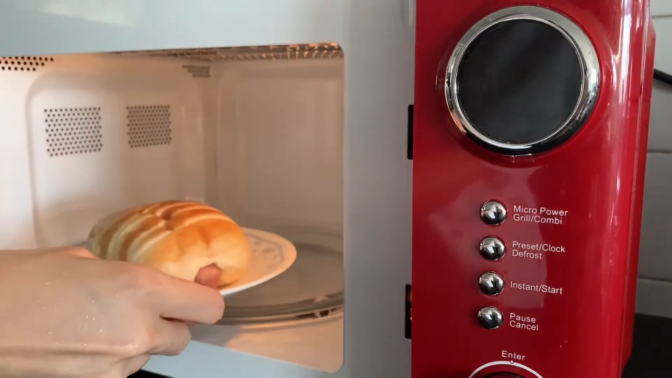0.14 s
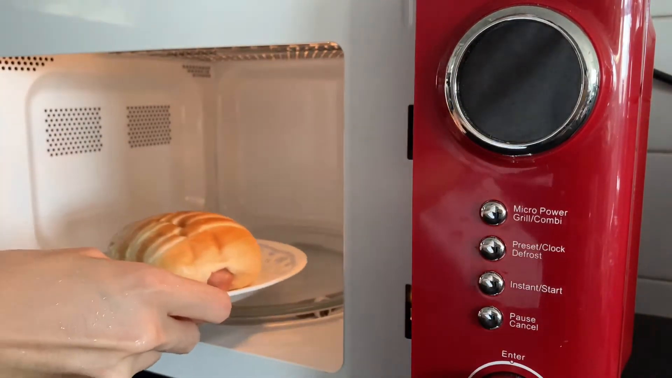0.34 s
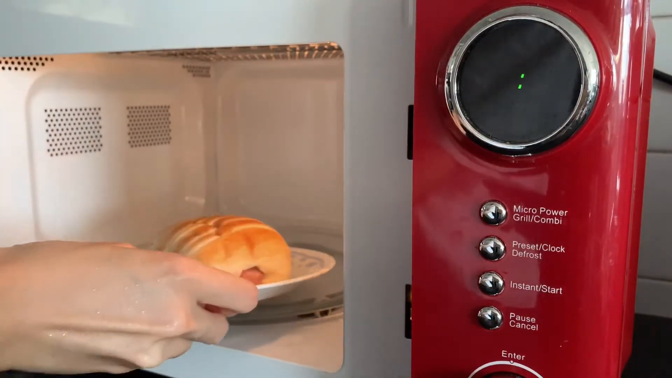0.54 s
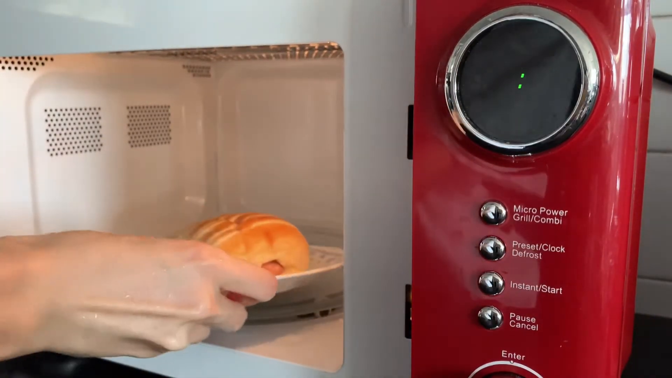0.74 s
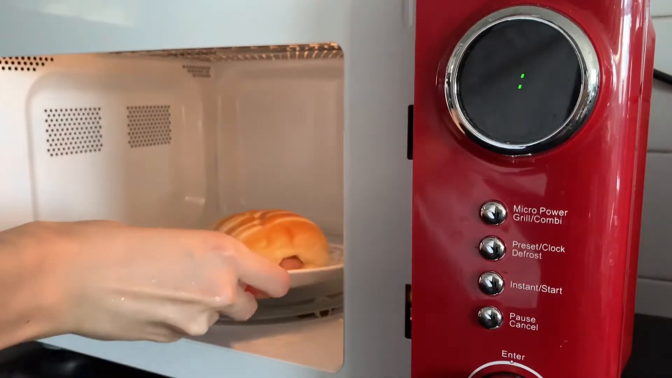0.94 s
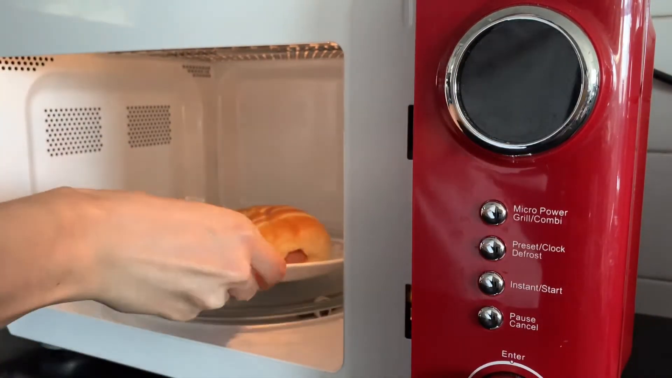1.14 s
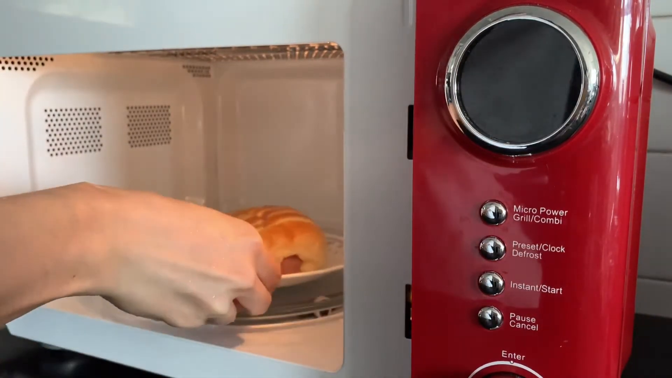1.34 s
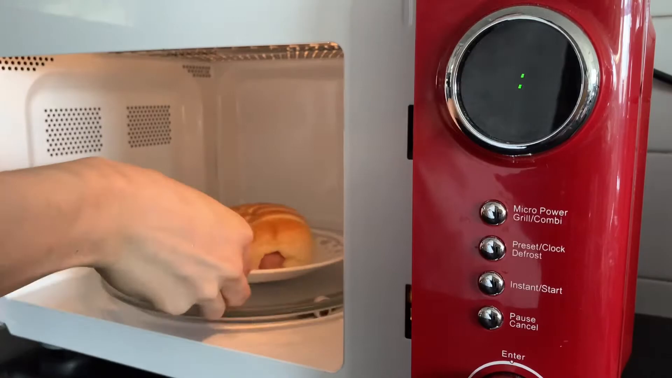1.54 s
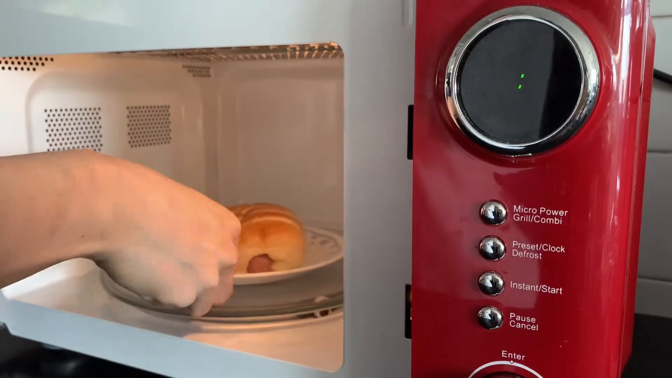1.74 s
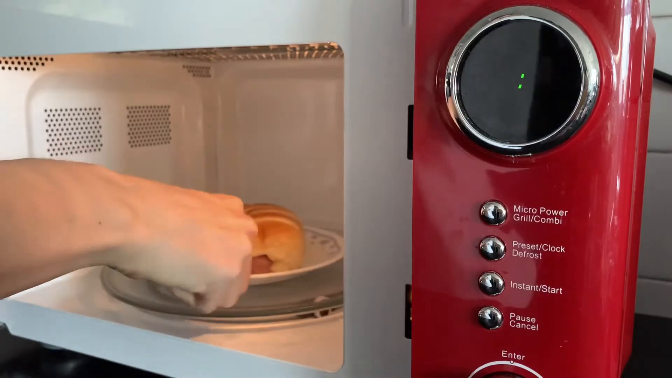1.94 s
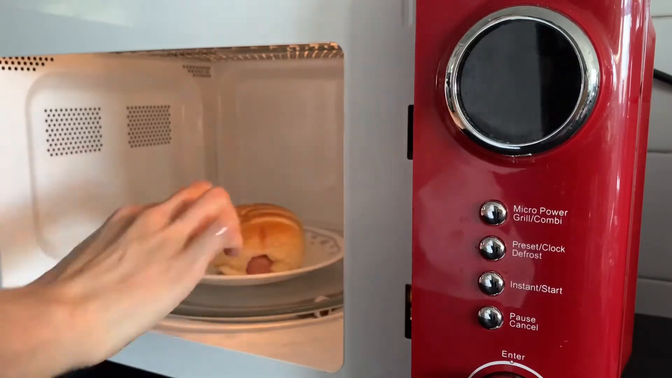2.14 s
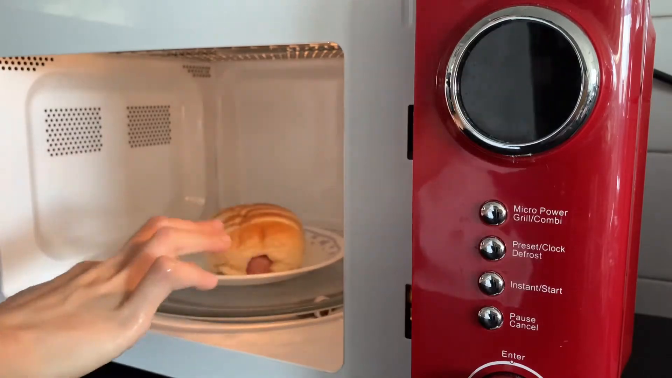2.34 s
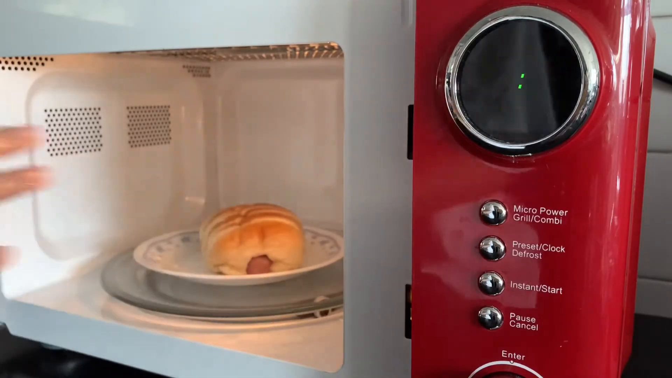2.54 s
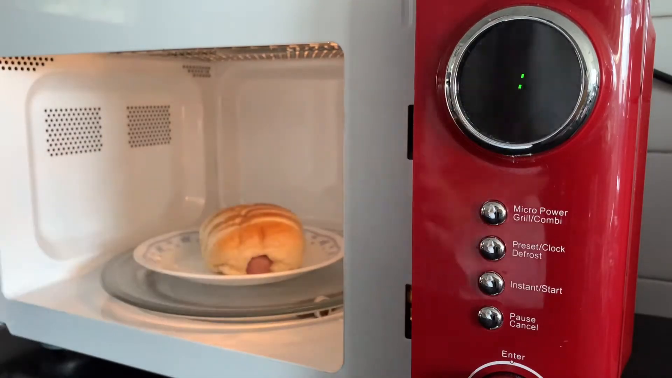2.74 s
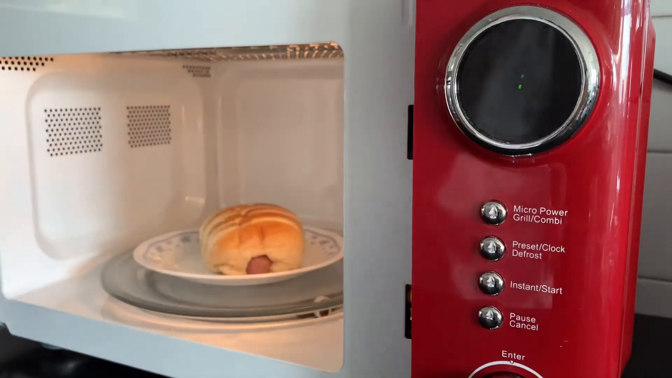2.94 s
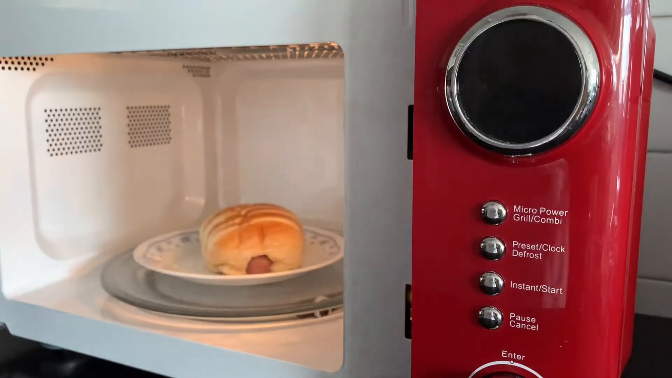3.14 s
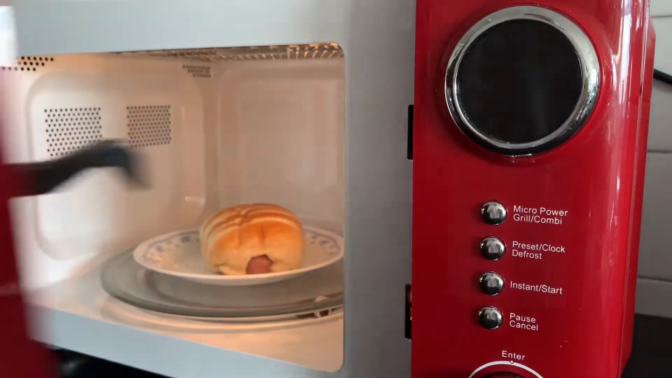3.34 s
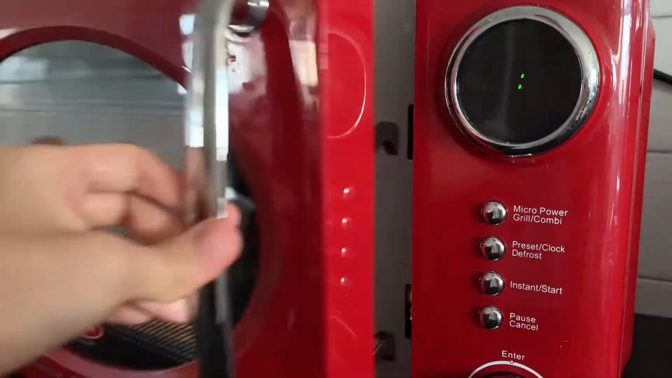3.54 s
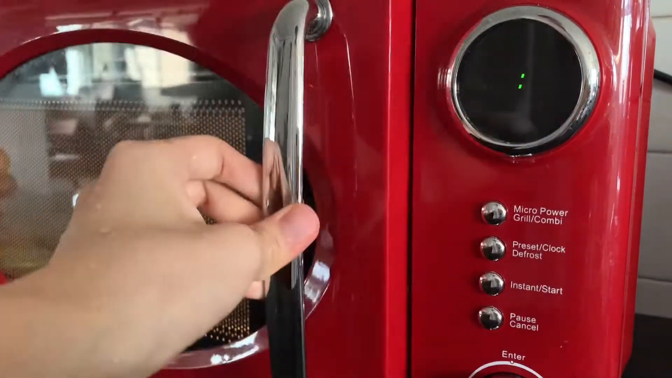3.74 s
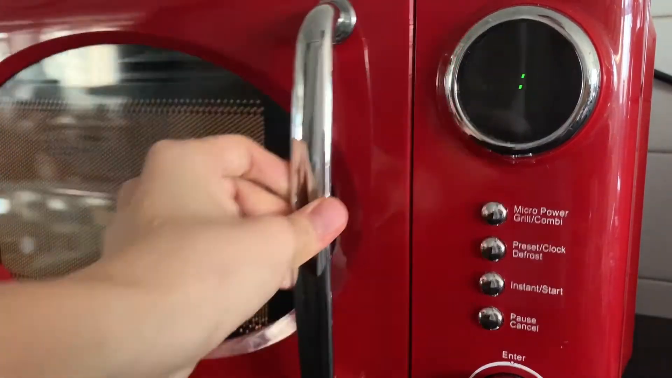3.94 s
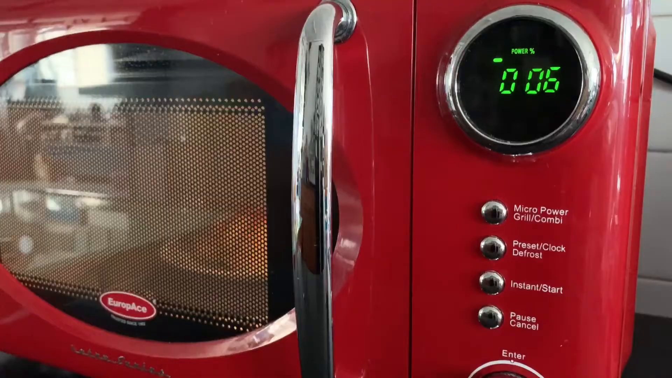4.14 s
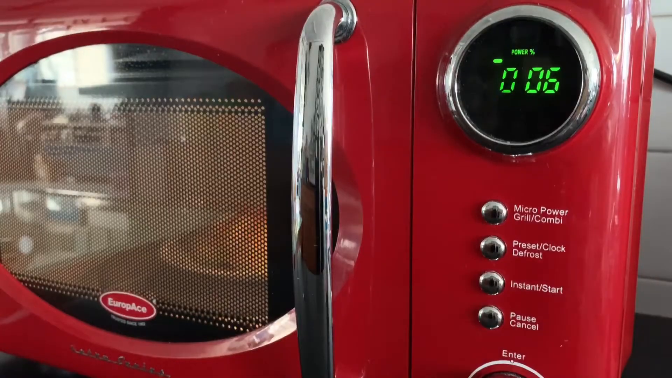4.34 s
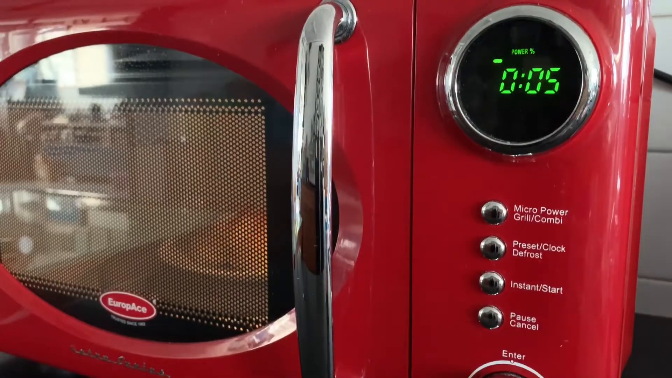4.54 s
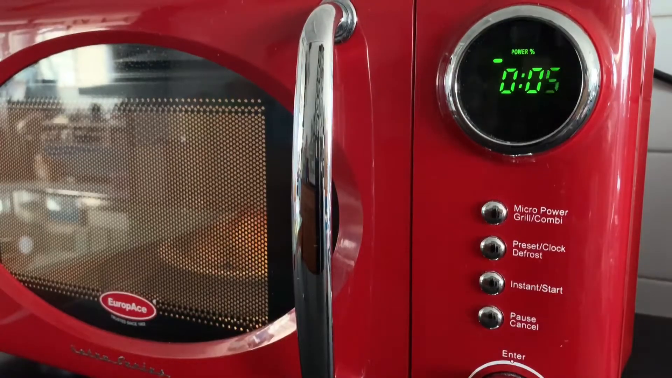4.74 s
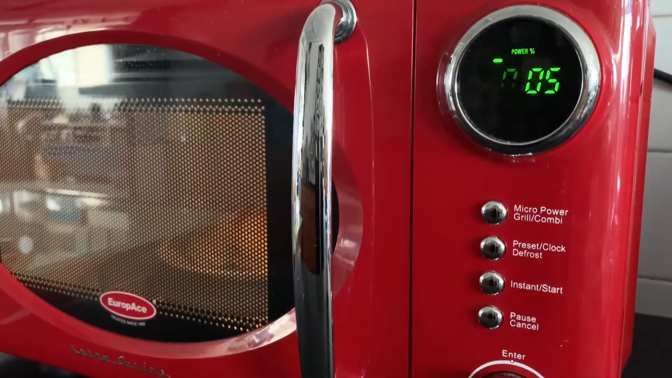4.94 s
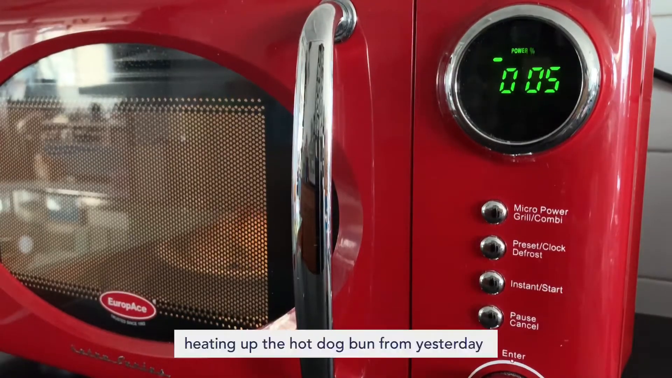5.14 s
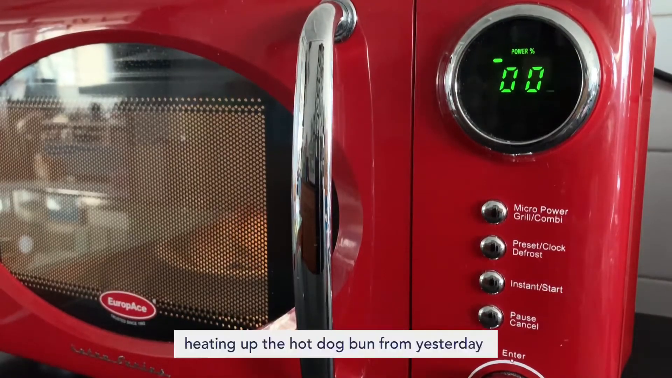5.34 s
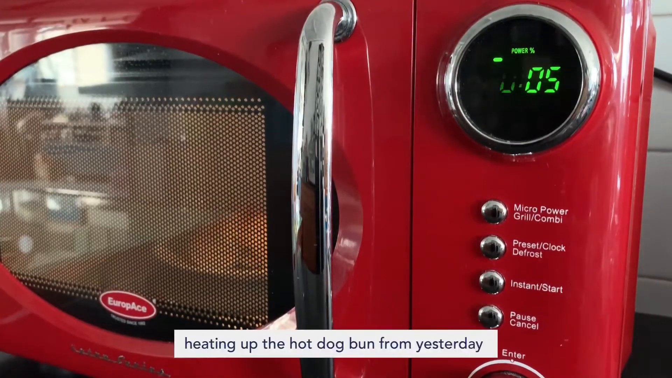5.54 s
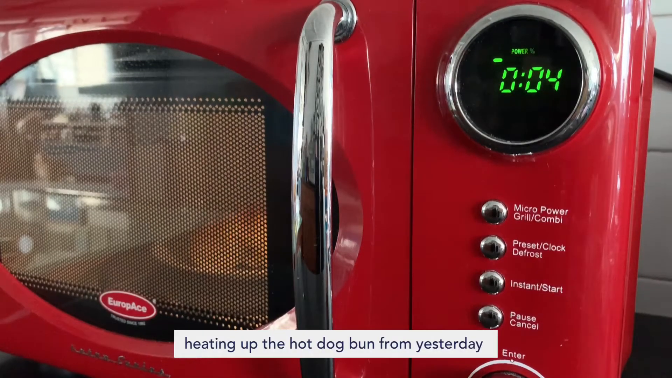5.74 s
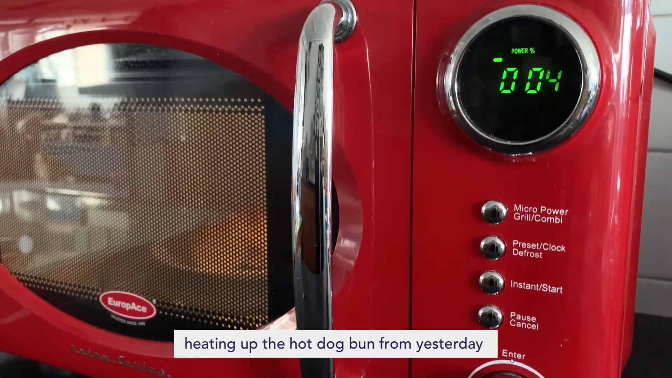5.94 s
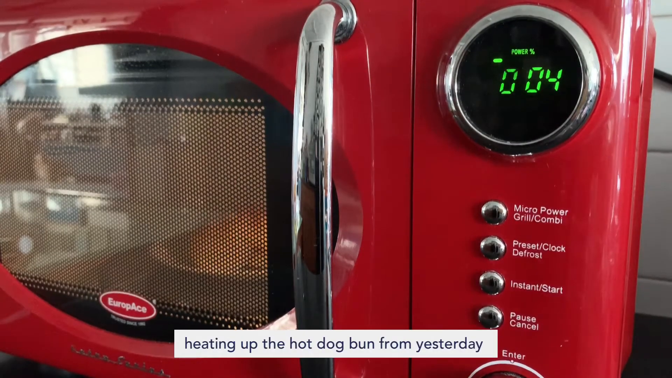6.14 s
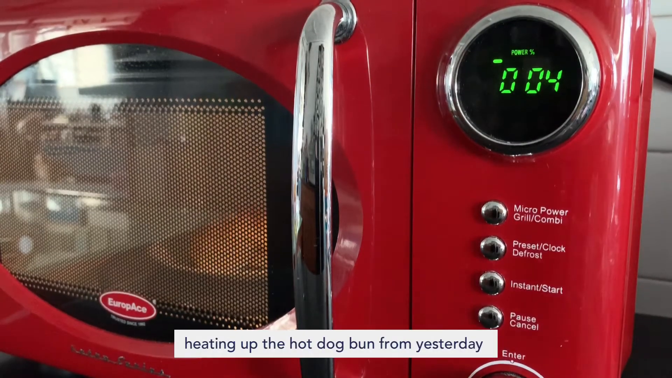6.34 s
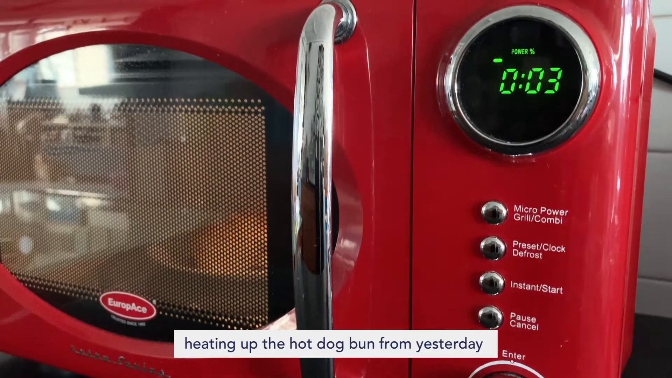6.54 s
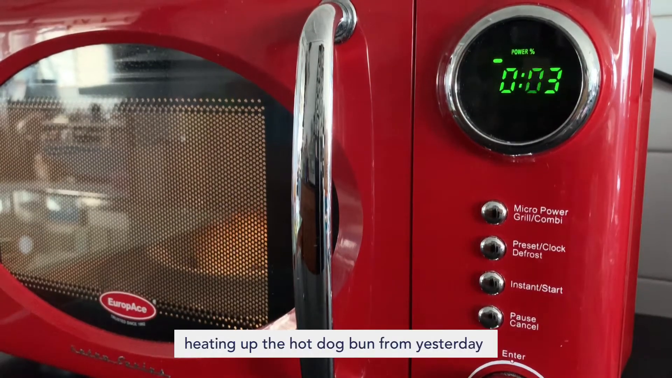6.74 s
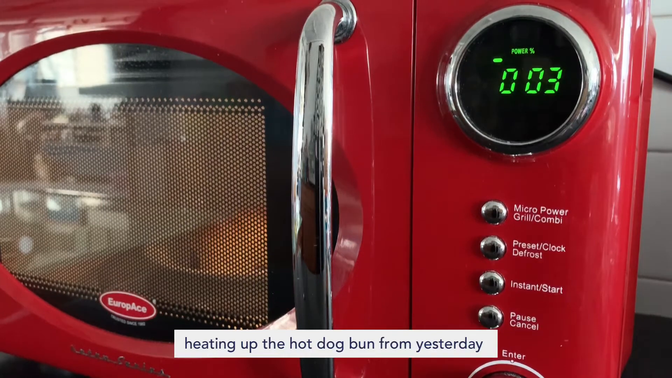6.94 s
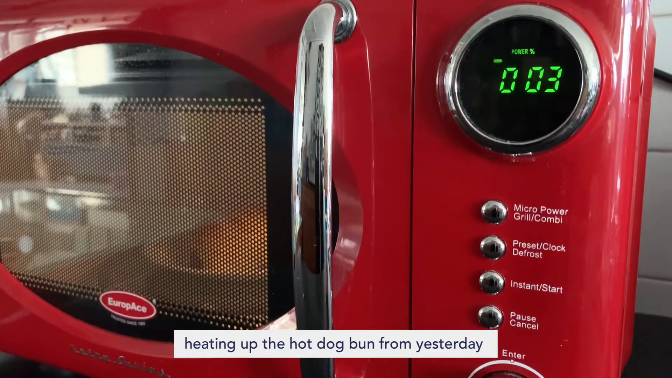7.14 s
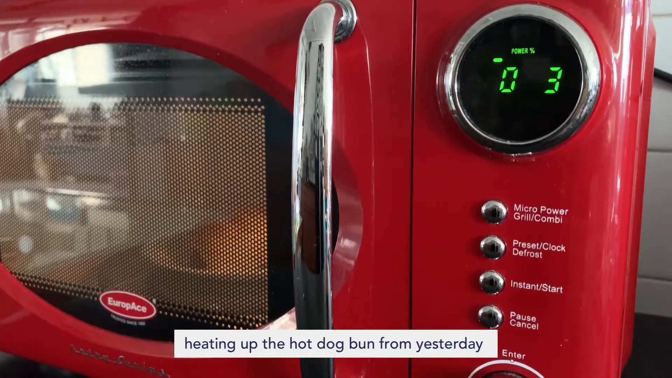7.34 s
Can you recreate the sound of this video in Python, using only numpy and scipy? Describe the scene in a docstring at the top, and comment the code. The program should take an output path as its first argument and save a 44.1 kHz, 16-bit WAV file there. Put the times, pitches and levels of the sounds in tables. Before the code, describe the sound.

Close stereo pickup in a quiet home kitchen with a faint low motor moaning. A china plate clinks sharply on a microwave's glass tray, squeaks as it slides, settles with short gritty taps and is nudged. After a pause the door clicks and slams hard; its tail is cut off by steady oven hum. Soft far bumps and rustles follow.

```python
"""A plate clinks on the glass tray of a microwave oven, slides, settles and is nudged while a far motor moans.
The door swings, latches and slams; the slam stops short and the oven is already humming.
Then something bumps far off in the kitchen, amid far rustles and a thin whistle.
Blows ring decaying sines under clacks of noise; air and rustles are coloured noise; hums are wandering sines.
A spaced pair of microphones hears the low bass nearly alike and much of the sound above it apart."""
import sys
import numpy as np
from scipy import signal
from scipy.fft import rfft, irfft
from scipy.io import wavfile
from scipy.ndimage import uniform_filter1d

SR = 44100
rng = np.random.default_rng(int(sys.argv[2]) if len(sys.argv) > 2 else 0)


def persist_wave(psi):
    """Save psi, clipped to +-1, as 16-bit WAV."""
    counts = np.round(np.clip(psi, -1, 1) * 32767).astype(np.int16)
    wavfile.write(sys.argv[1], SR, np.atleast_2d(counts).T)


N = 326340

# Left-right likeness of the room's sound. Each row: frequency in Hz, likeness from -1 to 1.
ROOM_LIKENESS = [(60, 0.93), (130, 0.33), (290, 0.71), (640, 0.089), (1410, -0.16), (3100, 0.019),
                 (6820, -0.18), (15000, 1)]
# Left-right likeness of the plate in the oven. Each row: frequency in Hz, likeness from -1 to 1.
PLATE_LIKENESS = [(60, 0.9), (130, 0.87), (290, 0.94), (640, 0.61), (1410, 0.063), (3100, -0.43),
                  (6820, 0.79), (15000, 0.16)]
# Colour of the gritty clack on the tray. Each row: frequency in Hz, relative level in dB per Hz.
GRIT_COLOUR = [(150, -53), (400, -1), (1000, -1.5), (1500, -1), (2500, -10), (4500, -13), (5500, -31.5),
               (7000, -14), (9500, -58), (13500, -27), (16000, -44)]


def gain_of(db):
    """Turns dB into amplitude."""
    return 10 ** (np.asarray(db) / 20)


def evened(x):
    """Scales to rms 1."""
    return x / np.sqrt(np.mean(x ** 2) + 1e-20)


def read(points, hz):
    """Reads a spectrum table on a log-frequency axis."""
    f, value = np.transpose(points)
    return np.interp(np.log(hz + 1), np.log(f + 1), value)


def curve(rows):
    """Reads a time table at every sample."""
    return np.interp(np.arange(N) / SR, *np.transpose(rows))


def drift(top_hz):
    """Slow chance of about rms 1: twenty sines of random phase, up to top_hz."""
    t = np.arange(0, N + 256, 256)
    rates = top_hz * np.geomspace(1 / 20, 1, 20)
    waves = sum(np.sin(2 * np.pi * (f * t / SR + rng.random())) for f in rates)
    return np.interp(np.arange(N), t, evened(waves))


def swell(start, rise, hold, fall):
    """Rises smoothly, holds and falls away; all in seconds."""
    t = np.arange(N) / SR - start
    return np.clip(np.minimum(t / rise, (rise + hold + fall - t) / fall), 0, 1) ** 2


def note_swell(start, length, fade):
    """A swell of a given length with equal fades."""
    return swell(start, fade, max(length - 2 * fade, 0), fade)


def glide(start, hz, sag_hz_per_s):
    """A sine whose pitch sinks steadily."""
    t = np.arange(N) / SR - start
    return np.sin(2 * np.pi * (hz - sag_hz_per_s * t / 2) * t)


def noise(colour, size, likeness=ROOM_LIKENESS, lean_db=0, low_hz=0, high_hz=SR):
    """Coloured noise in two ears; about rms 1 before the band is cut out."""
    hz = np.fft.rfftfreq(size, 1 / SR)
    left, other = rfft(rng.standard_normal((2, size)))
    same = np.clip(read(likeness, hz), -1, 1)
    right = same * left + np.sqrt(1 - same ** 2) * other
    shape = gain_of(read(colour, hz) + lean_db)
    spectrum = np.array([left, right]) * shape / np.sqrt(np.mean(shape ** 2))
    return irfft(spectrum * ((hz >= low_hz) & (hz < high_hz)), size)


def sinking_tones(notes, sag_hz_per_s, fade_s, smooth, steady):
    """Thin sinking tones, part steady and part fuzz that differs between the ears."""
    # smooth is in samples; steady is the steady share against a fuzz of 1
    wobble = evened(uniform_filter1d(rng.standard_normal((2, N)), round(smooth)))
    fuzz = evened(steady + wobble)
    return fuzz * sum(gain_of(db) * note_swell(s, length, fade_s) * glide(s, hz, sag_hz_per_s)
                      for s, length, db, hz in notes)


def strike(blows, modes, colour, rise_s, clack_s, tail_s, tail_db, flutter_db, contact_s, contact_db,
           likeness=PLATE_LIKENESS):
    """Each blow rings the modes near its favoured pitch, over a clack of noise and its tail in the room."""
    tail_top_hz, tail_dull_db = 4510, 5.5  # the room keeps less treble: dB lost per octave above this
    echo_build_s = 0.0016  # the echoes in the box take this long to stir the ring
    out = np.zeros((2, N + SR))
    t = np.arange(5 * 2 ** 12) / SR
    noise_hz = np.fft.rfftfreq(len(t), 1 / SR)
    hz, mode_db, t60 = np.transpose(modes)[:, :, None]
    index = np.arange(len(hz))[:, None]
    apart = np.arccos(np.clip(read(likeness, hz), -1, 1)) * (-1) ** index  # phase between the ears
    swing_up = 1 - np.exp(-t / (rise_s + 0.9 / hz))  # low modes take longer to start
    turn = 2 * np.pi * hz * t + np.pi * index  # neighbouring modes set off in opposite directions
    swings = np.sin(turn + np.array([-apart, apart]) / 2)
    loud_start = gain_of(contact_db * np.exp(-(t / contact_s) ** 4))  # driven harder while the contact lasts
    duller = gain_of(-tail_dull_db * np.log2(np.maximum(noise_hz / tail_top_hz, 1)))
    closing = np.clip((t[-1] - t) * 10, 0, 1)
    for s, ring_db, clack_db, favoured_hz, focus_db, damping in blows:
        struck_db = mode_db - focus_db * abs(np.log2(hz / favoured_hz))
        fade = swing_up * gain_of(struck_db - 60 * t / np.clip(t60 * damping, 1 / 100, 2))

        # echoes inside the box make the ring flutter, largely alike in both ears
        beats = evened(uniform_filter1d(rng.standard_normal((2, len(hz), len(t) // 64)), size=12))
        beats = evened(beats + 0.65 * beats[::-1])
        beats = uniform_filter1d(np.repeat(beats, 64, axis=2), size=256)
        flutter = gain_of(flutter_db * (1 - np.exp(-t / echo_build_s)) * beats)
        ring = (flutter * fade * swings).sum(1)
        ring /= np.sqrt(np.sum(gain_of(struck_db) ** 2))

        lean_db = -focus_db * abs(np.log2((noise_hz + 20) / favoured_hz))
        tail = irfft(rfft(noise(colour, len(t), likeness, lean_db)) * duller, len(t))
        tail *= gain_of(tail_db - 60 * t / tail_s)
        contact = gain_of(-60 * t / clack_s) * noise(colour, len(t), likeness, lean_db)
        clack = (contact + tail) * (1 - np.exp(-t / rise_s))
        at = round(s * SR)
        blow = gain_of(ring_db) * ring + gain_of(clack_db) * clack
        out[:, at:at + len(t)] += loud_start * closing * blow
    return out[:, :N]


def patchy(x):
    """Random gain on small patches of time and frequency."""
    z = signal.stft(x, nperseg=1024)[2]
    patches = uniform_filter1d(rng.standard_normal(z.shape[1:]), size=2, axis=0)  # across frequency
    patches = evened(uniform_filter1d(patches, size=6, axis=1))  # along time
    lumps = gain_of(3.5 * patches)  # how far the patches stand out, in dB
    return signal.istft(z * evened(lumps), nperseg=1024)[1][:, :N]


def air(colour, db):
    """The noise floor: noise with a slowly swelling rumble, and random gain on patches of the rest."""
    # Level of the rumble against the rest. Each row: time in seconds, level in dB.
    rumble_level = [(0, -0.5), (1.2, -0.5), (2.0, -4.5), (7.4, 0.5)]
    rumble_top_hz, air_swell_db = 250, .7
    rumble = noise(colour, N, high_hz=rumble_top_hz) * gain_of(curve(rumble_level) + 1.4 * drift(2.0))
    upper = patchy(noise(colour, N, low_hz=rumble_top_hz)) * gain_of(air_swell_db * drift(12.))
    return gain_of(db) * (rumble + upper)


def quiet_air():
    """The noise floor with the oven off."""
    # Colour of the floor with the oven off. Each row: frequency in Hz, relative level in dB per Hz.
    quiet_colour = [(12, -50), (20, -24), (43, -7.5), (134, -4), (163, -10), (270, -20), (301, -15.5),
                    (459, -28.5), (513, -22), (738, -28.5), (825, -23), (975, -29), (1050, -23),
                    (1120, -25.5), (1146, -21), (1175, -28.5), (2500, -36), (6000, -50), (6570, -50),
                    (7300, -59.5), (16000, -92.5)]
    return air(quiet_colour, -44)


def running_air():
    """The noise floor with the oven on."""
    # Colour of the floor with the oven on. Each row: frequency in Hz, relative level in dB per Hz.
    running_colour = [(12, -47.5), (20, -8), (113, -9), (168, -5.5), (187, -7.5), (216, -14), (319, -12.5),
                      (422, -21.5), (590, -19), (825, -21.5), (2320, -33.5), (4670, -49), (10800, -74),
                      (11800, -80.5), (16000, -84)]
    return air(running_colour, -45.5)


def hum(tones):
    """Sines that wander in pitch and waver in level, the same in both ears."""
    total = 0
    for hz, db, wander_hz, waver_db in tones:
        level = np.sqrt(2) * gain_of(db + waver_db * drift(6.))
        total = total + level * np.sin(2 * np.pi * np.cumsum(hz + wander_hz * drift(3.6)) / SR)
    return total


def mains_hum():
    """A steady low tone under everything."""
    # The mains tone. Each row: pitch in Hz, level in dB, wander in Hz, waver in dB.
    mains_tones = [(100, -51.5, 0.21, 0.5)]
    return hum(mains_tones)


def drone():
    """A deep tone that wanders while the oven is off."""
    # The low drone. Each row: pitch in Hz, level in dB, wander in Hz, waver in dB.
    drone_tones = [(60.3, -57.5, 2.5, 2.5)]
    return hum(drone_tones)


def moan():
    """A far motor: low tones that sink and waver."""
    # The motor's moans. Each row: start in seconds, length in seconds, level in dB, pitch in Hz.
    moans = [(-.1, 0.77, -47.5, 140), (.9, 1.17, -53.5, 159), (2.25, 0.546, -48.5, 146.2),
             (2.9, 0.54, -54.5, 130)]
    sag_hz_per_s, fade_s = 9.69, 0.043
    waver = gain_of(1.5 * drift(16.0))
    return np.sqrt(2) * waver * sum(gain_of(db) * note_swell(s, length, fade_s) * glide(s, hz, sag_hz_per_s)
                                    for s, length, db, hz in moans)


def rustling():
    """A far hiss of coloured noise that comes and goes."""
    # The far rustles. Each row: start, rise, hold and fall in seconds, level in dB.
    rustles = [(4.895, 0.068, 0.095, 0.043, -66.5), (5.038, 0.026, 0.022, .08, -64),
               (5.15, 0.03, 0.027, 0.27, -66.5), (5.57, 0.063, 0.028, 0.27, -68.5),
               (6.03, .09, 1.11, 0.18, -70.5), (7.207, 0.2, .1, .1, -59.5)]
    # Colour of the hiss. Each row: frequency in Hz, relative level in dB per Hz.
    hiss_colour = [(880, -30), (1500, -10.5), (2370, -3), (3060, -20.5), (4040, -5), (4460, -9),
                   (6690, -16), (11800, -44.5), (14100, -39.5), (16000, -58.5)]
    return sum(gain_of(db) * swell(*shape) for *shape, db in rustles) * noise(hiss_colour, N)


def whistling():
    """A thin whistle, mostly fuzz, whose pitch sinks."""
    # The whistles. Each row: start in seconds, length in seconds, level in dB, pitch in Hz.
    whistles = [(6.05, 0.67, -72, 4020), (6.78, .25, -71, 3950)]
    return sinking_tones(whistles, sag_hz_per_s=40, fade_s=0.072, smooth=200, steady=.2)


def bumping():
    """Far bumps ring a cupboard and a long tail."""
    # The bumps. Each row: start in seconds, ring in dB, clack in dB, favoured pitch in Hz,
    # focus in dB lost per octave away from it, damping as a factor on the ring time.
    bumps = [(4.945, -38.5, -50.5, 396, 5.1, 1.0), (5.0555, -32.5, -40, 1490, 3.7, 0.74),
             (5.085, -40, -42, 617, 7.3, 0.43), (5.108, -47, -46, 1000, 3.9, 0.69),
             (5.135, -40.5, -53, 694, 5.4, 0.79), (5.165, -58, -50, 600, 4, 0.51),
             (5.195, -53, -51.5, 2000, 1.7, 0.96)]
    # What rings in the cupboard. Each row: pitch in Hz, relative level in dB, 60 dB decay in seconds.
    cupboard_modes = [(202, 7, 0.47), (352, 1, 0.75), (530, -16, 0.58), (590, -10, 0.92), (673, -2, 0.63),
                      (890, -6, 0.34), (1070, -7.5, 0.43), (1460, -1, 0.2), (1790, -7, 0.14),
                      (2320, -24, .2), (3330, -17, .2)]
    # Colour of the far clack. Each row: frequency in Hz, relative level in dB per Hz.
    far_colour = [(120, -30), (250, 5), (400, -3), (660, -7), (1050, -9.5), (1500, -11), (3300, -18),
                  (7000, -25), (12000, -70)]
    return strike(bumps, cupboard_modes, far_colour, rise_s=0.0041, clack_s=0.08, tail_s=0.35, tail_db=0.0,
                  flutter_db=3.4, contact_s=0.0041, contact_db=2.7, likeness=ROOM_LIKENESS)


def oven_hum():
    """Fan and transformer as sines that wander and waver."""
    # The oven's tones. Each row: pitch in Hz, level in dB, wander in Hz, waver in dB.
    oven_tones = [(162.1, -43.5, 0.33, 0.41), (208.7, -68, 0.33, 1.7), (323, -56, 1, 1.1),
                  (39, -78, 0.82, 1.5)]
    return hum(oven_tones)


def sliding():
    """The rim scrapes over the glass as rough noise and squeaks as a sinking tone."""
    # The slides. Each row: start in seconds, length in seconds, scrape in dB, squeak in dB, squeak pitch in Hz.
    slides = [(.8, 0.163, -58.5, -59, 1860), (.97, 0.183, -54.5, -57.5, 1536)]
    # Colour of the scrape. Each row: frequency in Hz, relative level in dB per Hz.
    scrape_colour = [(900, -9), (1250, -28), (1400, 2), (1530, -16), (1600, -25), (1690, 3.5), (1850, -33),
                     (3500, -44), (7000, -36), (11000, -78)]
    fade_s = 0.015
    pushes = sum(gain_of(db) * note_swell(s, length, fade_s) for s, length, db, *_ in slides)
    scrape = pushes * gain_of(1.8 * drift(65.0)) * noise(scrape_colour, N, PLATE_LIKENESS)
    squeaks = [(s, length, db, hz) for s, length, _, db, hz in slides]
    return scrape + sinking_tones(squeaks, sag_hz_per_s=220, fade_s=fade_s, smooth=400, steady=2.5)


def nudging():
    """Nudges ring the glass tray under a gritty clack."""
    # The nudges. Each row: start in seconds, ring in dB, clack in dB, favoured pitch in Hz,
    # focus in dB lost per octave away from it, damping as a factor on the ring time.
    nudges = [(1.7895, -43, -36, 2000, 4, 0.84), (1.7925, -33, -34, 2200, 4.3, 1.36),
              (1.803, -39, -55, 650, 3.3, 0.39), (1.829, -47.5, -62, 2170, 19, 1.3),
              (1.937, -54, -62, 1050, 12, 1.2), (2.311, -40, -49, 2080, 6.5, 0.57),
              (2.376, -44, -53, 710, 10, 0.6)]
    # What rings in the tray. Each row: pitch in Hz, relative level in dB, 60 dB decay in seconds.
    tray_modes = [(235, 11.5, 0.19), (370, -3, 0.28), (500.7, 4.5, 0.36), (654, -16, 0.1), (739, 2.5, 0.27),
                  (880, -0.5, 0.11), (1094, 7.5, 0.072), (1410, -8, 0.075), (1840, -14, 0.17),
                  (2010, -12, 0.23), (2122, -7.5, 0.3), (2490, -17, 0.14), (2952, -13, 0.4),
                  (3450, -19, 0.4), (3820, -24, .2), (4440, -15, 0.19), (4960, -14, 0.092),
                  (6440, -16, 0.068), (6820, -16, 0.093), (9400, -14, 0.051)]
    return strike(nudges, tray_modes, GRIT_COLOUR, rise_s=0.0019, clack_s=0.047, tail_s=0.31, tail_db=-9.5,
                  flutter_db=2.5, contact_s=0.0044, contact_db=1.2)


def settling():
    """Touches ring the plate as it lies on the tray, short and gritty."""
    # The touches. Each row: start in seconds, ring in dB, clack in dB, favoured pitch in Hz,
    # focus in dB lost per octave away from it, damping as a factor on the ring time.
    touches = [(.794, -29.5, -57, 1870, 87, 0.67), (1.015, -40.5, -68, 1530, 34, 1.5),
               (1.157, -25.5, -42, 1440, 2.1, 0.67), (1.179, -25.5, -38.5, 1490, 1.6, 0.58),
               (1.213, -42.5, -64, 1860, 34, 1.1), (1.248, -35, -49, 1500, 3, 1.16),
               (1.39, -58, -49.5, 1100, 1.3, 0.79)]
    # What rings in plate and tray. Each row: pitch in Hz, relative level in dB, 60 dB decay in seconds.
    resting_modes = [(758, -5.5, 0.28), (846, -5.5, 0.39), (1092, 2.5, 0.17), (1290, 4.5, 0.12),
                     (1360, -17, 0.087), (1516, 8.5, 0.093), (1760, 0, 0.073), (1840, -3.5, 0.12),
                     (2030, -10, 0.1), (2300, -11, 0.17), (2700, -20, .15), (2930, -23, .2),
                     (3180, -11, 0.22), (3810, -20, .12), (4660, -22, .1), (4850, -9, 0.1),
                     (6330, -14, 0.074), (7030, -21, 0.13), (9160, -30, .15), (9700, -28, 0.11)]
    return strike(touches, resting_modes, GRIT_COLOUR, rise_s=0.0027, clack_s=0.05, tail_s=0.71, tail_db=-10.5,
                  flutter_db=2.1, contact_s=0.002, contact_db=3.0)


def clinking():
    """Clinks ring the china plate, whose ring drops as it begins to settle."""
    # The clinks. Each row: start in seconds, ring in dB, clack in dB, favoured pitch in Hz,
    # focus in dB lost per octave away from it, damping as a factor on the ring time.
    clinks = [(.5427, -12, -14, 1640, 7, 0.68), (.5447, -26, -19.5, 4170, 2.5, 0.56),
              (.556, -28.5, -26.5, 282, 10.5, 1.02), (.589, -25, -49.5, 1740, 29, 1),
              (.5965, -27.5, -57, 1750, 22.5, 1.7), (.641, -35, -61, 1730, 12, 1.5)]
    # What rings in the plate. Each row: pitch in Hz, relative level in dB, 60 dB decay in seconds.
    plate_modes = [(233, -7.5, 0.27), (347, -10, 0.24), (497.3, -6.5, 0.7), (900, -11, 0.6),
                   (1024, 10.5, 0.04), (1100, -12.5, .3), (1243, -9.5, 1.9), (1250, -21, 1.3),
                   (1327, -18, 0.78), (1360, -24.5, 0.26), (1685, 4, 0.11), (1787, 4, 0.26),
                   (1730, -11, 0.2), (1870, -17, 0.72), (1810, -13, 0.27), (1940, -5.5, 0.11),
                   (2140, -23, .3), (2200, -21, 0.7), (2600, -16.5, .2), (2620, -22, .25), (2945, 1, 0.47),
                   (3030, -10.5, .7), (3300, -15, 0.19), (2954, -12, 0.49), (3460, -16, 0.55),
                   (3680, -0.5, .06), (3714, -7.5, 0.5), (3715, -10, .5), (3870, -20, 0.5),
                   (4021, -10, .45), (4310, -10, 0.7), (4270, 1.5, 0.11), (4420, -11, .25), (4430, -15, 1),
                   (4350, -16.5, 1.2), (4791, -26, 0.41), (5130, -32, 0.5), (5647, -25, 0.35),
                   (6040, -6.5, 0.18), (6400, -29, 0.41), (6500, -22, 0.5), (6910, -17, 0.5),
                   (7000, -19.5, 0.36), (6900, -17, 0.66), (7430, -24.5, .26), (7600, -20.5, 0.35),
                   (8150, -27, .4), (8700, -14.5, 0.18), (9000, -6, 0.35), (9260, -26, .2),
                   (9600, -13.5, 0.41), (9500, -26, .3), (10240, -16.5, 0.41), (13110, -25, .25),
                   (13290, -9, 0.3), (13860, -8.5, 0.25), (14150, -20.5, .15), (14700, -21.5, .12)]
    # Colour of the china clack. Each row: frequency in Hz, relative level in dB per Hz.
    china_colour = [(100, -41), (250, -25), (700, -13), (1000, -3.5), (1390, -20), (1760, -8.5),
                    (2300, -15), (2980, -15.5), (4240, -7.5), (5200, -26.5), (6500, -16), (8000, -29.5),
                    (9300, -31), (11500, -42), (13700, -40.5), (16000, -53)]
    plate = strike(clinks, plate_modes, china_colour, rise_s=0.0015, clack_s=0.012, tail_s=0.41, tail_db=-13.5,
                   flutter_db=3.3, contact_s=0.013, contact_db=5.6)
    # just after the first touch on the tray the plate's ring drops
    drop_s, drop_over_s, drop_db = 0.81, .04, 7
    return plate * gain_of(-drop_db * np.clip((np.arange(N) / SR - drop_s) / drop_over_s, 0, 1))


def door():
    """Every blow is a bright click, a knock of the panel and a late thump of the cabinet."""
    # The door meets its hooks and frame. Each row: start in seconds, click, knock and thump in dB,
    # click pitch in Hz, knock pitch in Hz.
    door_blows = [(3.6555, -55.5, -32.5, -32.5, 2290, 740), (3.665, -57, -40.5, -51.5, 1500, 700),
                  (3.821, -43, -44, -50.5, 2300, 400), (3.8251, -34.5, -32, -29, 4100, 340),
                  (3.888, -53, -38.5, -52.5, 1500, 500), (3.8968, -37, -22.5, -48, 1490, 466),
                  (3.9035, -27, -42, -51, 4500, 900), (3.913, -32.5, -49, -48, 3000, 500),
                  (3.9197, -30, -19, -27, 1200, 328), (3.9227, -16.5, -14, -11.5, 1498, 470),
                  (3.925, -17, -22.5, -19, 3300, 480), (3.9312, -28, -34, -30.5, 1480, 690),
                  (3.94, -36.5, -45, -30.5, 3000, 700), (3.956, -36, -46, -44.5, 2200, 500)]
    # Click, knock and thump of every blow. Each row: lag in seconds, clack in dB against the ring,
    # focus in dB per octave, damping as a factor on the ring time.
    door_parts = [(0.0003, 1, 1, 0.59), (0.0005, -10, 6.5, 1), (.0075, -13.5, 33, .3)]
    # What rings in the door. Each row: pitch in Hz, relative level in dB, 60 dB decay in seconds.
    door_modes = [(93.4, 13, 0.31), (147.6, 9.5, 0.86), (177.3, 7.5, 1), (241, 5.5, 0.4), (333, 0, 0.33),
                  (410, -1, 0.37), (454, 10, 0.07), (699, 6.5, 0.16), (743, -6.5, 0.21), (982, 4.5, 0.071),
                  (1093, -3, 0.058), (1290, -1, 0.12), (1504, 5.5, 0.057), (1760, 3, 0.11),
                  (2090, -6.5, .1), (2240, -3, 0.1), (2400, 1.5, 0.06), (3490, 5, 0.042),
                  (4000, 1.5, 0.044), (4540, -6, 0.082), (4790, -7, 0.08), (5160, -8.5, 0.061)]
    # Colour of the plastic clack. Each row: frequency in Hz, relative level in dB per Hz.
    plastic_colour = [(40, -37), (120, -13), (300, 3), (460, 4), (700, -9.5), (1500, -8), (2700, -20),
                      (3600, -16), (6000, -22.5), (10000, -30.5), (12000, -46), (14000, -28.5),
                      (16000, -50.5)]
    # Left-right likeness of the door. Each row: frequency in Hz, likeness from -1 to 1.
    front_likeness = [(60, 0.97), (130, 0.93), (290, 0.92), (640, 0.5), (1410, -0.12), (3100, 0.5),
                      (6820, -0.27), (15000, 0.7)]
    thump_hz = 109.6
    blows = []
    for s, *levels, click_hz, knock_hz in door_blows:
        pitches = (click_hz, knock_hz, thump_hz)
        for db, hz, (lag, clack_db, focus_db, damping) in zip(levels, pitches, door_parts):
            blows.append((s + lag, db, db + clack_db, hz, focus_db, damping))
    return strike(blows, door_modes, plastic_colour, rise_s=0.00044, clack_s=0.047, tail_s=0.34, tail_db=-8.0,
                  flutter_db=1.2, contact_s=0.0092, contact_db=5.3, likeness=front_likeness)


def loading():
    """Plate, tray and door in the quiet kitchen."""
    plate_and_tray = clinking() + sliding() + settling() + nudging()
    return plate_and_tray + door() + quiet_air() + drone() + moan()


def heating():
    """Fan and transformer hum, with far sounds of the house."""
    return running_air() + oven_hum() + bumping() + rustling() + whistling()


def scene():
    """The slam gives way to the running oven within a millisecond."""
    jump_s = 3.9662
    after = np.clip((np.arange(N) / SR - jump_s) * 1000, 0, 1)
    return (1 - after) * loading() + after * heating() + mains_hum()


def record(dry):
    """The microphones lose the deepest bass and round off the loudest peaks; then the band limit."""
    ceiling, edge_hz = 1.1, 16200
    thinned = signal.sosfilt(signal.butter(2, 32., "high", fs=SR, output="sos"), dry)
    rounded = ceiling * np.tanh(thinned / ceiling)
    band_limit = signal.firwin(511, edge_hz, window=("kaiser", 9), fs=SR)
    return signal.oaconvolve(rounded, band_limit[None], "same")


dry = scene()
out = record(dry)
persist_wave(out)
```